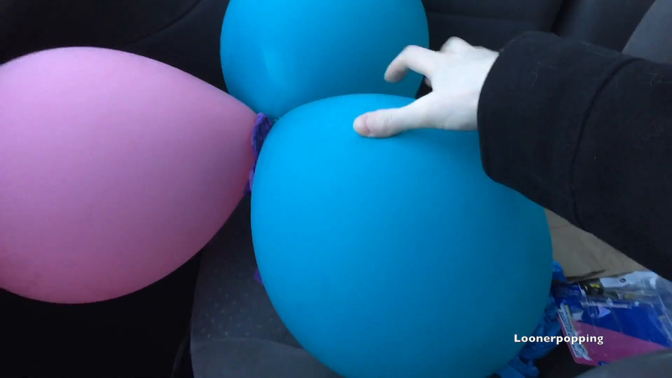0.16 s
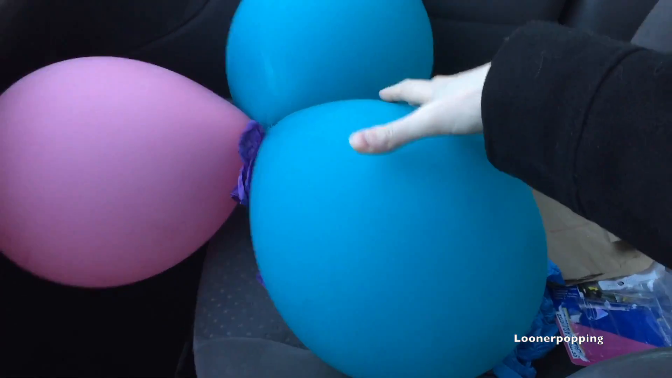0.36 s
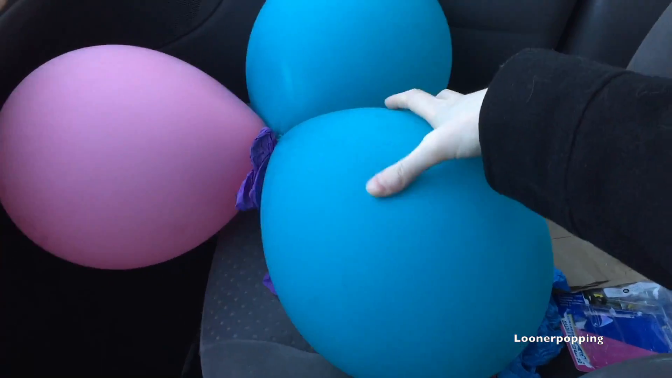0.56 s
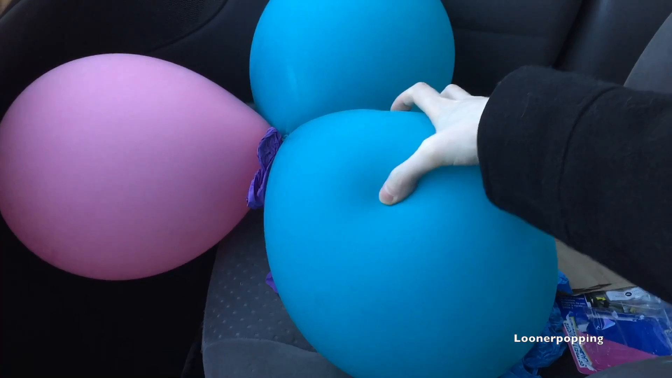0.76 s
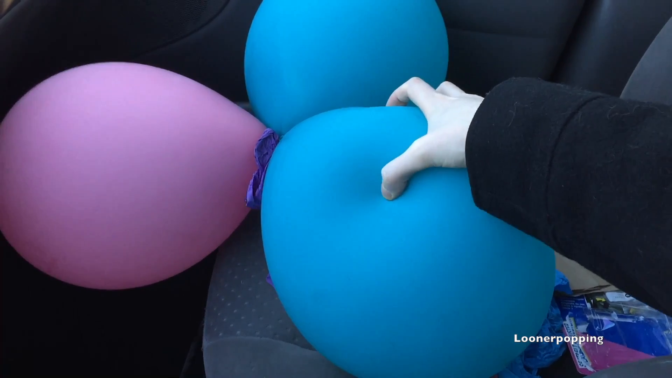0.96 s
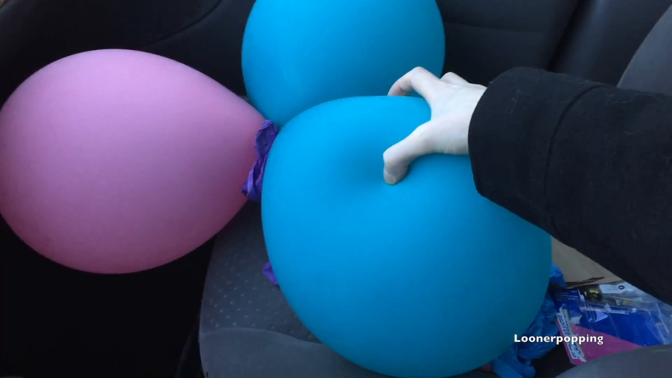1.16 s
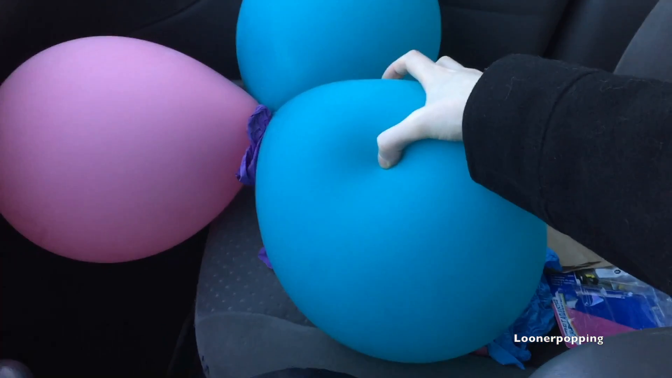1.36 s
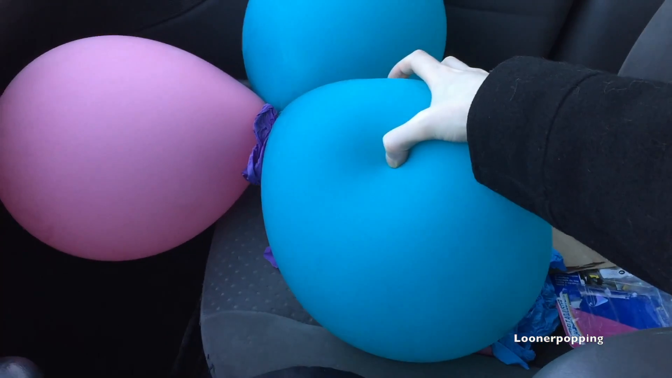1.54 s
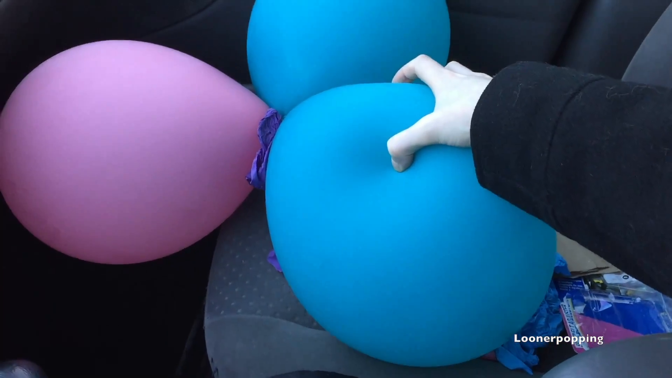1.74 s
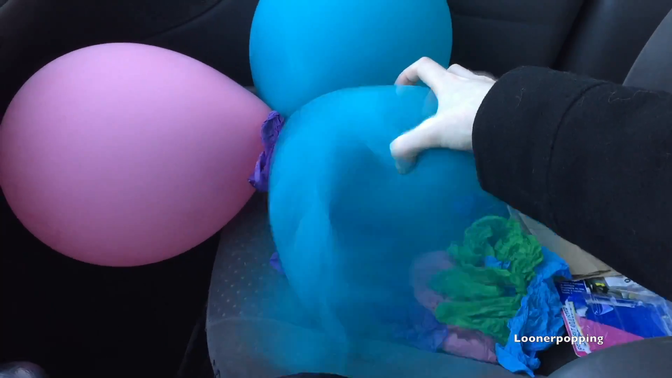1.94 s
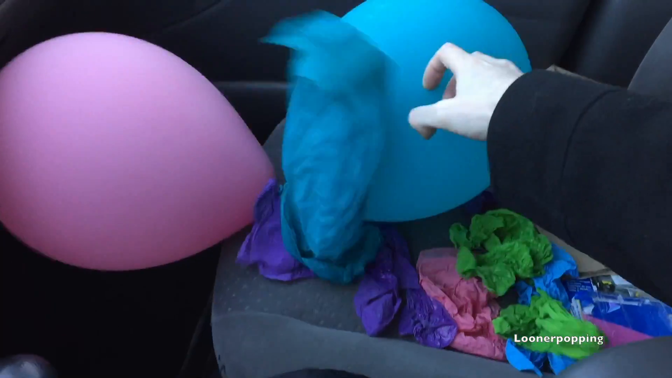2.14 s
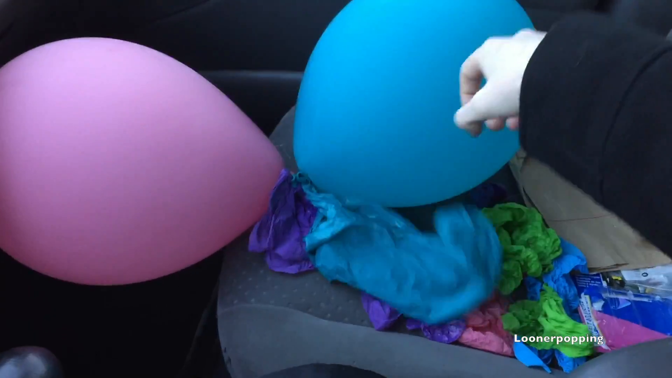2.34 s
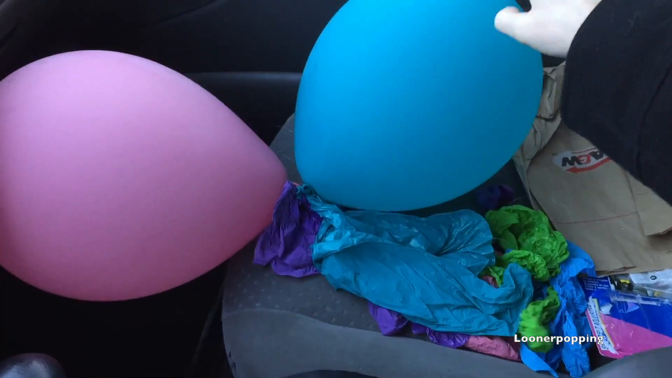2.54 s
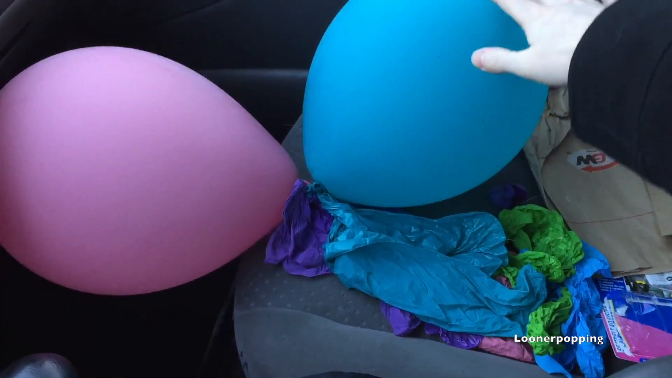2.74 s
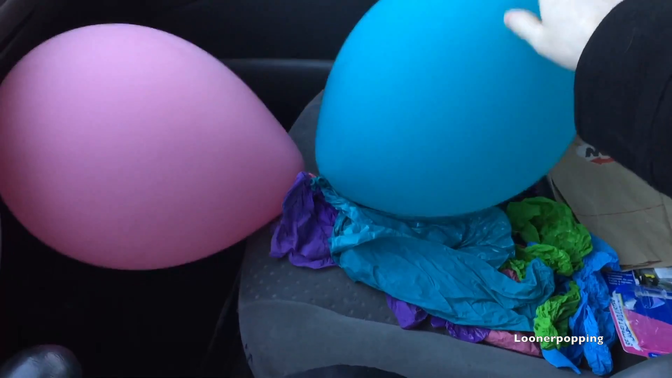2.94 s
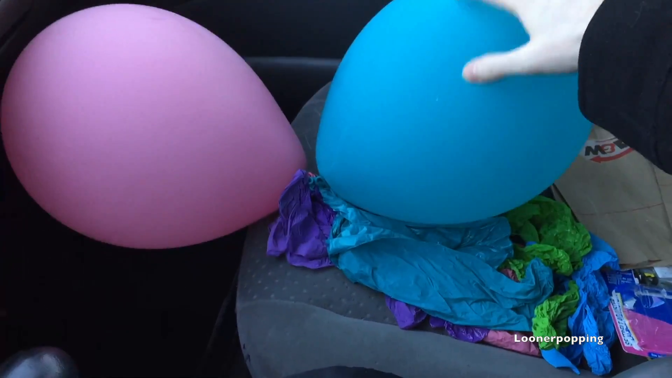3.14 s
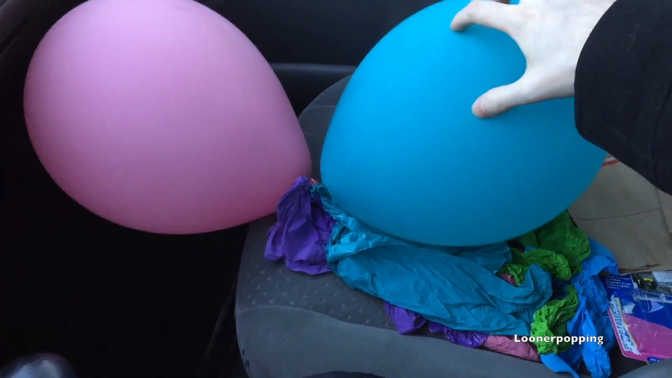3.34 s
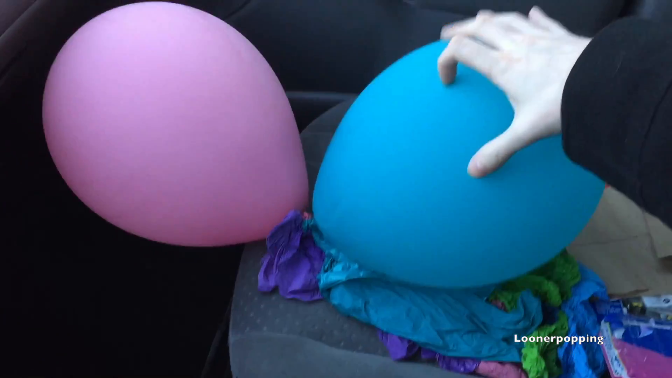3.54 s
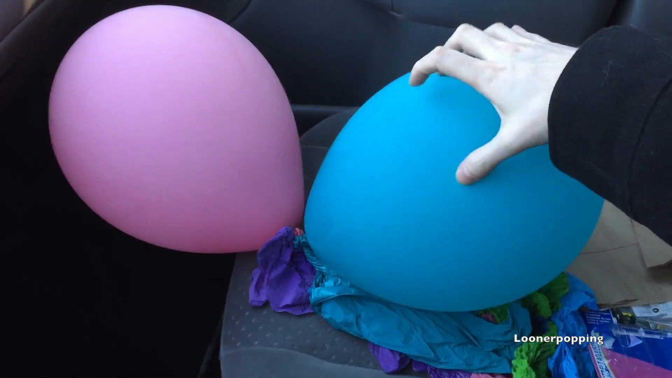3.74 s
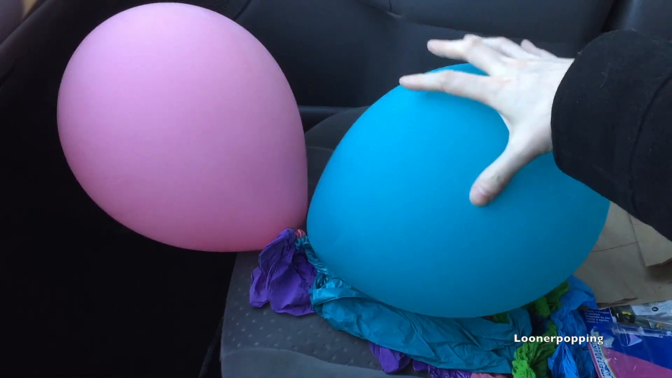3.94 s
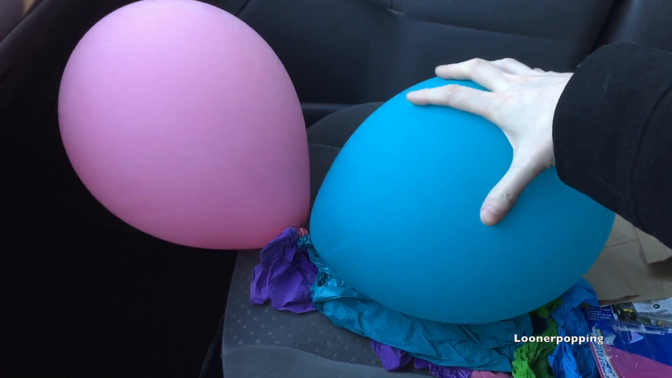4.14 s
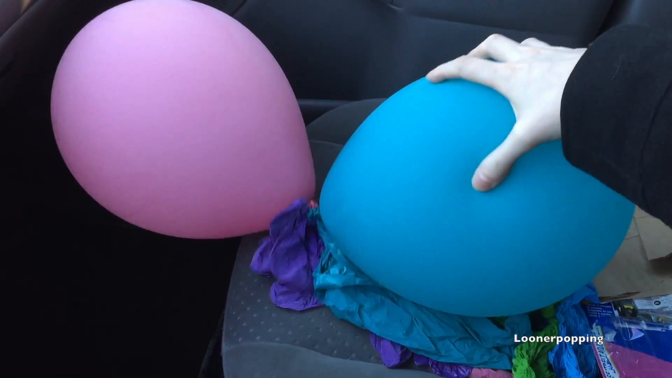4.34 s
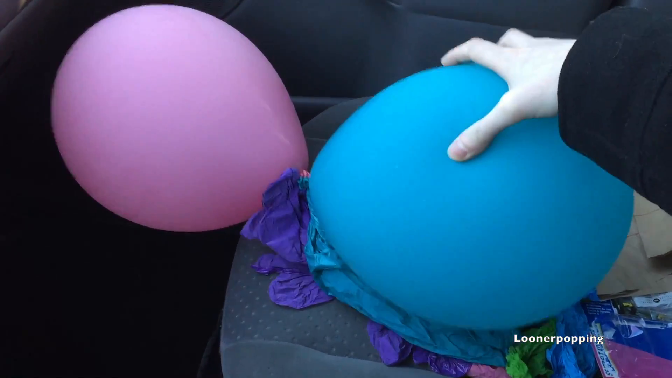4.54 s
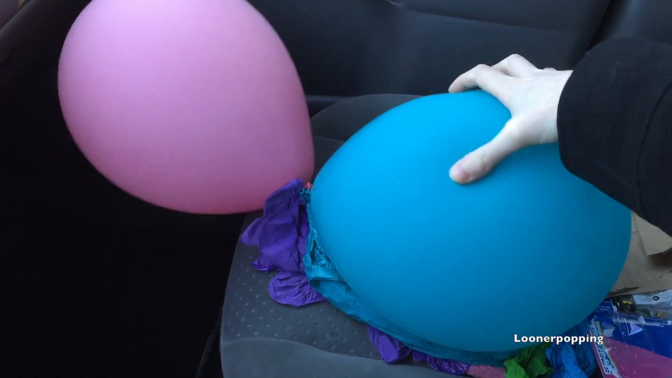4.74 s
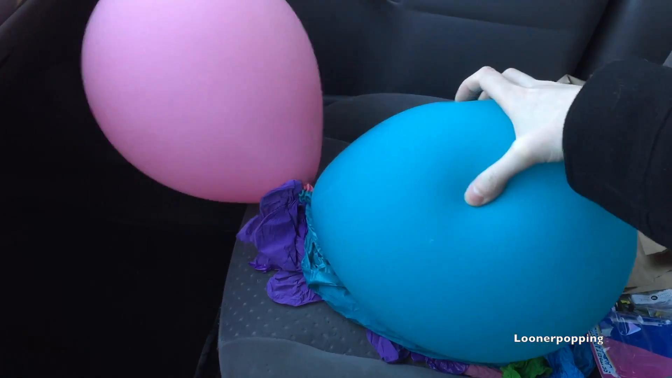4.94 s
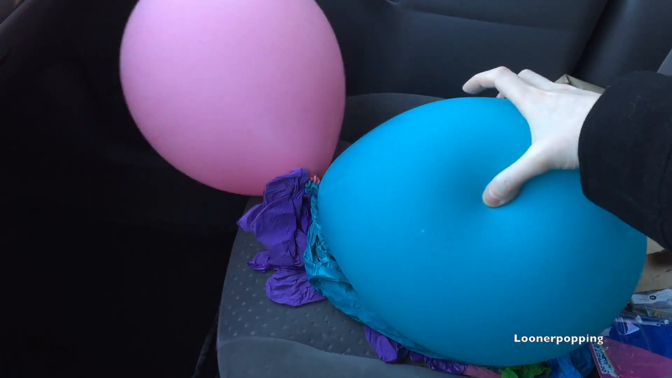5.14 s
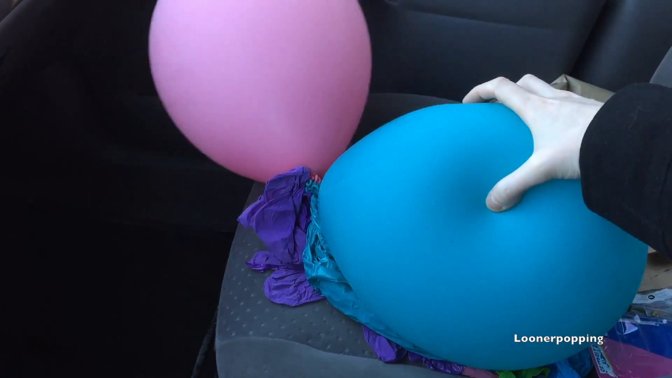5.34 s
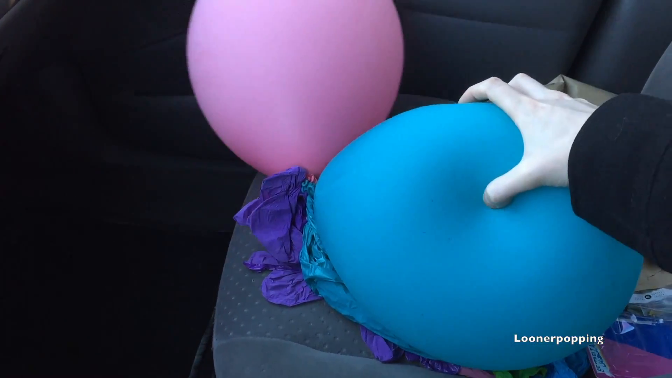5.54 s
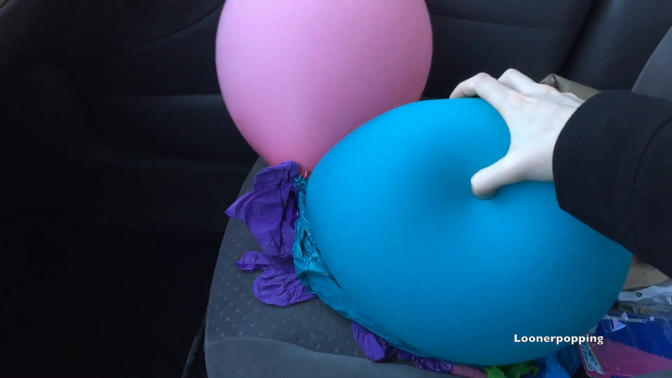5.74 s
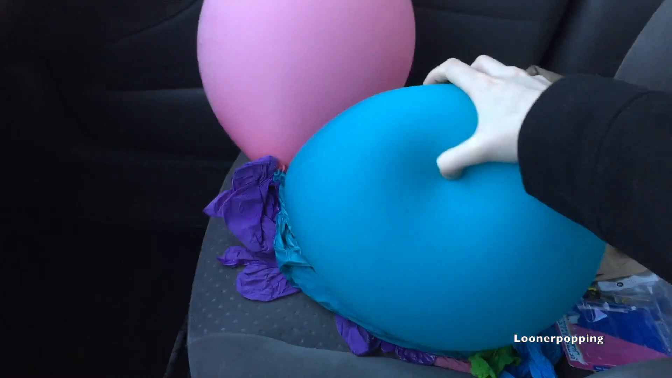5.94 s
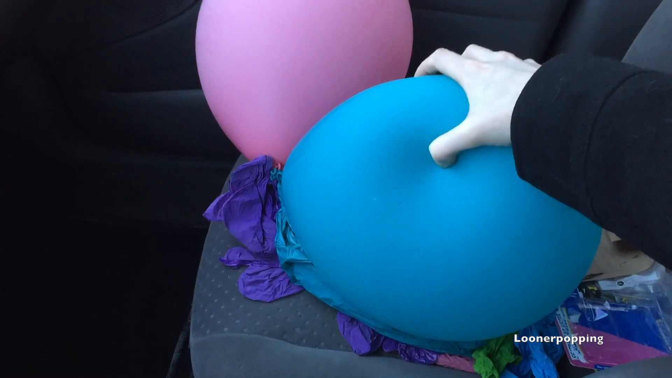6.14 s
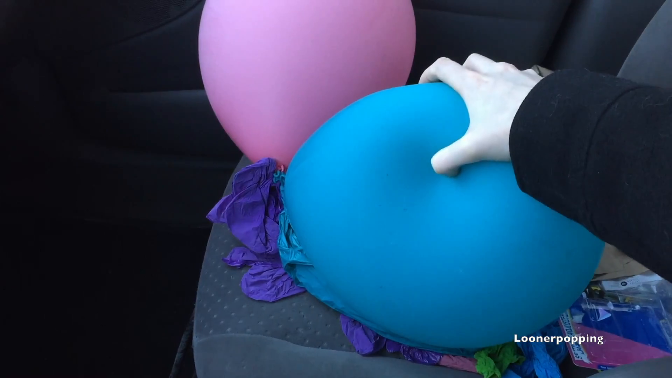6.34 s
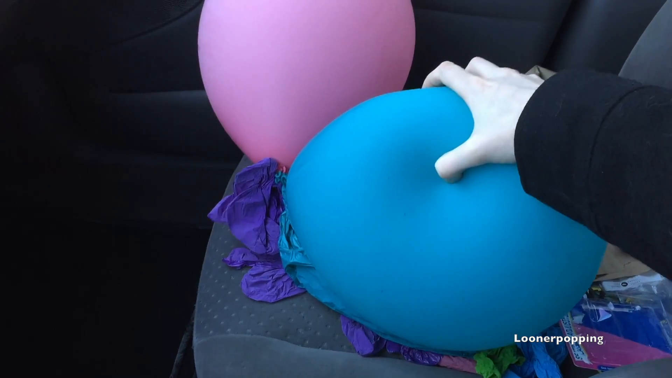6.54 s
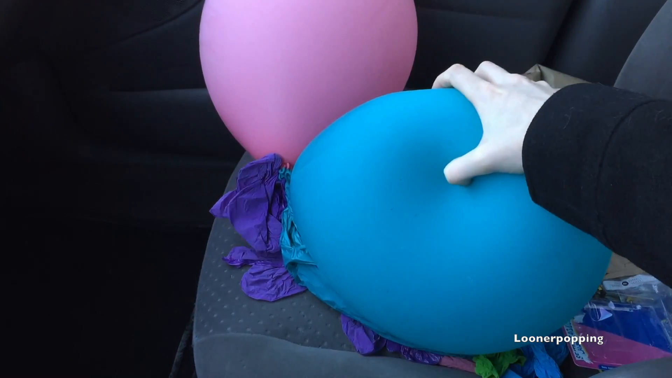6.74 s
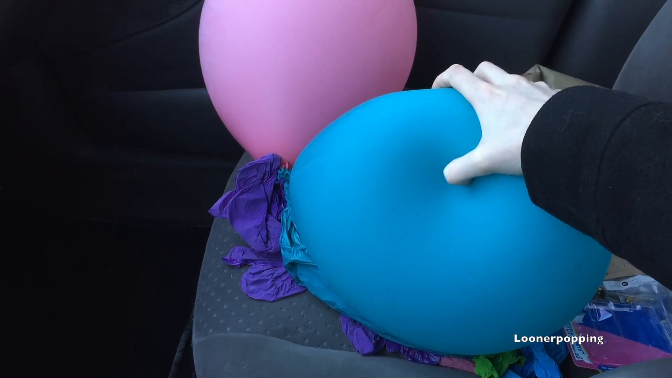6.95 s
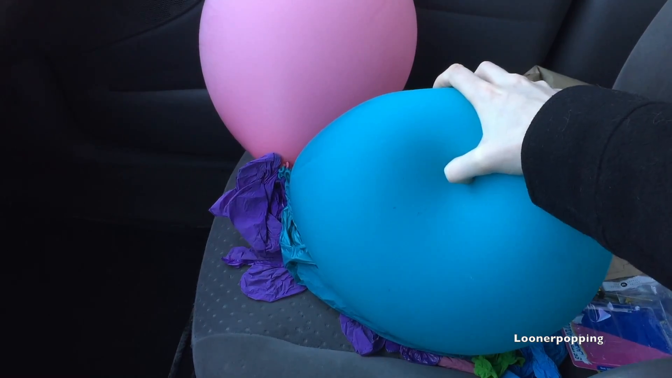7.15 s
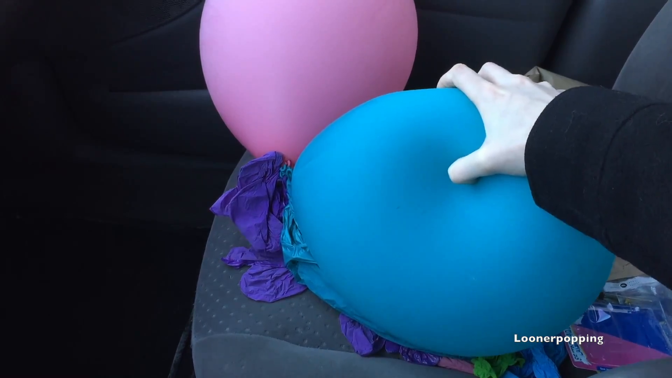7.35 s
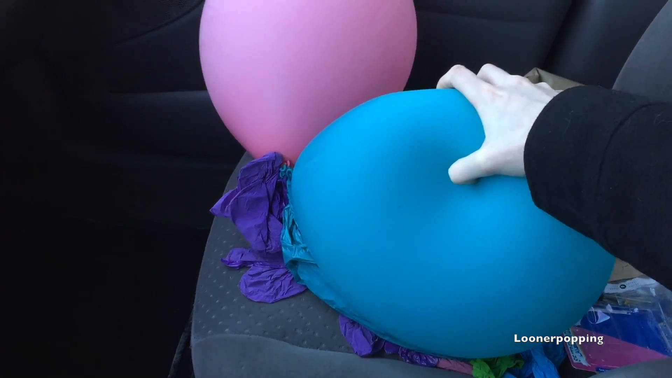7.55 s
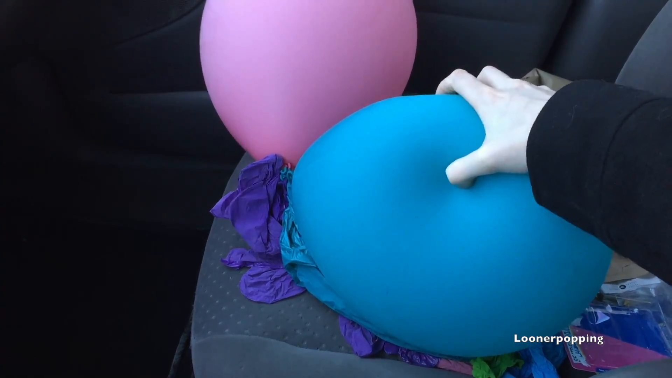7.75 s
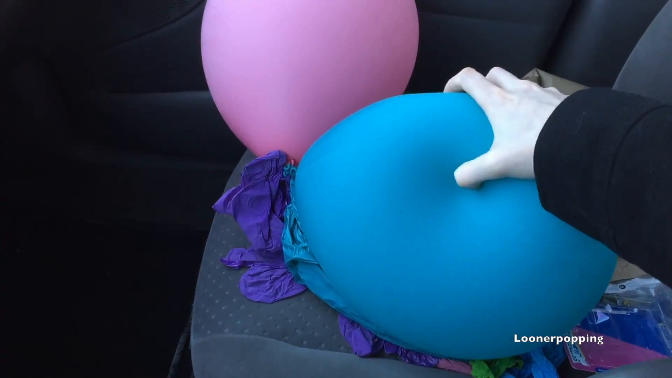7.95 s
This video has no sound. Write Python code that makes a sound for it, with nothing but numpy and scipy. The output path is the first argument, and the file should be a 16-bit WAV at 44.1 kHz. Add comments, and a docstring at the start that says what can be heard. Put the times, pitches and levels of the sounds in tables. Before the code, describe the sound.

Hands squeak and creak against taut latex balloons in a parked car; one bursts with a loud overloaded bang, then the squeezing resumes.

```python
"""Squeezing balloons in a parked car

A hand squeezes latex balloons on the seat, an arm's length from the microphone. The taut rubber sticks and
slips: single slips snap, quick runs of slips creak and squeak, and each rings the air inside.
The balloon bumps and knocks against the seat over a low rumble with faint hiss. One balloon bursts,
overloads the microphone and makes the cabin boom; then the hand grips the next.
"""
import sys
import numpy as np
from scipy import signal
from scipy.fft import rfft, irfft, next_fast_len
from scipy.io import wavfile
from scipy.ndimage import uniform_filter1d, map_coordinates

SR = 44100
rng = np.random.default_rng(int(sys.argv[2]) if len(sys.argv) > 2 else 0)


def dump(signal):
    """Clip the signal to [-1, 1] and save it as 16-bit WAV at the path in sys.argv[1]."""
    limited = np.clip(np.atleast_2d(signal).T, -1, 1)
    pcm = np.round(limited * 32767).astype(np.int16)
    wavfile.write(sys.argv[1], SR, pcm)


N = 356769

SIZE = 2 ** 14  # samples in one response or short sound
TIME = np.arange(N) / SR
AGE = np.arange(SIZE) / SR  # s since a sound began
HZ = np.fft.rfftfreq(SIZE, 1 / SR)
BURST_S = 2.046


def amp(db):
    """Decibels to gain."""
    return 10 ** (np.asarray(db) / 20)


def unit(x):
    """x at rms 1."""
    return x / np.sqrt(np.mean(x ** 2))


def along(points, hz):
    """(Hz, value) points read on a log frequency axis."""
    f, v = np.transpose(points)
    return np.interp(np.log(hz + 1), np.log(f), v)


def add(track, s, sound):
    """Mix a sound into the track at time s."""
    start = max(round(s * SR), 0)
    track[start:start + len(sound)] += sound[:N - start]


def filtered(x, gain):
    """x times a gain that depends on frequency."""
    size = next_fast_len(N + SIZE)
    return irfft(rfft(x, size) * gain(np.fft.rfftfreq(size, 1 / SR)), size)[:N]


def causal(db):
    """The minimum-phase response with these levels."""
    cepstrum = irfft(np.log(amp(db)))
    cepstrum[1:SIZE // 2] *= 2
    cepstrum[SIZE // 2 + 1:] = 0
    return np.exp(rfft(cepstrum))


def fade(t, t60):
    """Exponential decay by 60 dB in t60 seconds."""
    return np.exp(-np.log(1000) * t / t60)


def treble_share(hz, corner_hz=4200):
    """Near 0 well below the corner, near 1 well above it."""
    return 1 - 1 / (1 + (hz / corner_hz) ** 4)


def wobble(hz):
    """A smooth random curve with hz knots a second."""
    knots = rng.standard_normal(int(N * hz / SR) + 4)
    return map_coordinates(knots, [TIME * hz])


def background(level_db=-66):
    """A low rumble in the closed car, under faint hiss: noise shaped to a fixed spectrum."""
    # spectrum of the quiet cabin: f/Hz, relative level/dB
    quiet = [(20, -23), (62, 0), (120, -1), (200, -14.5), (400, -21), (1500, -27.5), (16000, -35.5)]
    noise = rng.standard_normal(N)
    return amp(level_db) * unit(filtered(noise, lambda hz: amp(along(quiet, hz))))


def cabin_tail():
    """Spectrum of the diffuse echoes in the car, of energy 1; the bass outlasts the rest."""
    # how long sound lingers in the cabin: f/Hz, t60/s
    linger = [(60, 0.2), (130, 0.27), (250, 0.031), (600, 0.077), (14000, 0.054)]
    hz, t, z = signal.stft(rng.standard_normal(SIZE), SR)
    decay = fade(t, along(linger, hz)[:, None])
    tail = signal.istft(z * decay, SR)[1][:SIZE]
    return rfft(tail / np.linalg.norm(tail))


def bumps(t60=0.19):
    """Soft pushes of the balloon on the seat: swelling, fading noise gives a dull thud in the cabin."""
    # shoves against the seat: t/s, rise/s, peak level/dB
    shoves = [(.031, 0.057, -31.5), (.295, 0.005, -43), (2.863, 0.0024, -38), (4.114, .024, -38),
              (4.25, 0.032, -40), (5.221, 0.017, -35), (6.049, .005, -39), (7.399, 0.0017, -40.5),
              (7.768, .0015, -38)]
    # spectrum of a thud: f/Hz, relative level/dB
    thud_spectrum = [(25, -28.5), (60, -7), (130, -1.5), (250, -16), (450, -20.5), (4000, -71)]
    out = np.zeros(N)
    for s, rise, db in shoves:
        swell = (1 - np.exp(-AGE / rise)) ** 2
        push = rng.standard_normal(SIZE) * swell * fade(AGE, t60)
        thud = irfft(rfft(push) * causal(along(thud_spectrum, HZ)))
        add(out, s, amp(db) * thud / np.abs(thud).max())
    return out


def knocks(t60=0.046, rise_s=0.00053):
    """The balloon judders on the seat; each hollow knock is a few damped swings of the whole balloon."""
    # knocks: t/s, f/Hz, level/dB before rise and decay
    judders = [(3.259, 125, -31.5), (4.657, 158, -29.5), (4.917, 134, -34), (5.997, 297, -34.5),
               (6.005, 328, -39), (6.018, 260, -34), (6.044, 374, -40), (6.057, 254, -32)]
    envelope = (1 - np.exp(-AGE / rise_s)) * fade(AGE, t60)
    out = np.zeros(N)
    for s, hz, db in judders:
        add(out, s, amp(db) * envelope * np.sin(2 * np.pi * hz * AGE))
    return out


def burst(blast_db=24.5, tear_t60=0.032, cabin_db=-10, boom_db=-24, blur_hz=16, flap_db=-58, flap_t60=.25):
    """The skin rips open, the freed air rings the cabin, and the rag trails off in a faint hiss."""
    # spectrum of the blast: f/Hz, relative level/dB
    blast_spectrum = [(25, -13.5), (60, -1.5), (130, 0.5), (350, 4.5), (700, -1), (1500, -6), (4000, -12.5),
                      (16000, -20)]
    # air modes of the cabin: f/Hz, level/dB relative to boom_db, t60/s
    cabin_modes = [(55.8, -18, 1), (122, -5.5, 0.12), (128, -17, 1), (180, -5.5, .25), (311.5, 2.5, .06)]
    tear = rng.standard_normal(SIZE) * fade(AGE, tear_t60)
    tear_in_cabin = rfft(tear / np.linalg.norm(tear)) + amp(cabin_db) * cabin_tail()
    blast = irfft(tear_in_cabin * causal(along(blast_spectrum, HZ)))
    boom = np.zeros(SIZE)
    for hz, db, t60 in cabin_modes:
        # crowded modes blur each ring: its phase drifts at random
        drift = np.cumsum(rng.standard_normal(SIZE)) * np.sqrt(2 * np.pi * blur_hz / SR)
        phase = 2 * np.pi * hz * AGE + uniform_filter1d(drift, size=512)
        boom += amp(db) * fade(AGE, t60) * np.sin(phase)
    flap = rng.standard_normal(SIZE) * amp(flap_db) * fade(AGE, flap_t60)
    out = np.zeros(N)
    add(out, BURST_S, amp(blast_db) * blast / np.linalg.norm(blast) + amp(boom_db) * boom + flap)
    return out


def surge(level_db=-11, start_hz=1100, end_hz=145, sag_s=0.0028, rise_s=.0007, hold_s=.014, t60=0.024):
    """The freed air of the burst swings to and fro, ever more slowly as the skin pulls away."""
    hz = end_hz + (start_hz - end_hz) * np.exp(-AGE / sag_s)
    envelope = (1 - np.exp(-AGE / rise_s)) * fade(np.maximum(AGE - hold_s, 0), t60)
    swing = np.sin(2 * np.pi * np.cumsum(hz) / SR)
    out = np.zeros(N)
    add(out, BURST_S, amp(level_db) * envelope * swing)
    return out


def squeals(waver=0.05, flutter_db=2, count=3):
    """Brief, wavering tones where the slips fall in step with a mode of the skin."""
    # squeals: centre t/s, length/s, start f/Hz, end f/Hz (before the waver),
    # level of the fundamental/dB, step to each next overtone/dB
    tones = [(0.106, 0.032, 663, 723, -23.5, -26), (.485, .026, 1651, 1680, -35, -12),
             (.513, 0.018, 2268, 2350, -29, -18), (.765, 0.082, 450, 413, -54.5, -4.5),
             (1.189, .045, 450, 472, -47.5, -1), (1.242, 0.038, 451, 426, -51.5, -1.5),
             (3.86, 0.021, 602, 620, -58, 1), (3.923, .07, 674, 553, -52, -6.5),
             (4.721, .016, 445, 560, -31.5, -16), (4.73, .014, 860, 1250, -31.5, -11),
             (6.184, 0.03, 230.3, 288, -21, -31)]
    out = np.zeros(N)
    for s, length, start_hz, end_hz, db, overtone_db in tones:
        size = int(length * SR)
        drift, flutter = unit(uniform_filter1d(rng.standard_normal((2, size)), size=300))
        hz = np.linspace(start_hz, end_hz, size) * (1 + waver * drift)
        phase = 2 * np.pi * np.cumsum(hz) / SR
        tone = sum(amp(k * overtone_db) * np.sin((k + 1) * phase) for k in range(count))
        envelope = np.hanning(size) * unit(amp(flutter_db * flutter))
        add(out, s - length / 2, amp(db) * envelope * tone)
    return out


def skin(near_t60=.024, near_db=2.5, cavity_db=8, cabin_db=-6, bend_cycles=.6, dent=0.04):
    """Response to one slip: a falling chirp, echoes inside the balloon, its air modes and the cabin."""
    # air modes inside the balloon: f/Hz, width/Hz (both before denting), level/dB relative to cavity_db
    cavity = [(275, 55, -2.5), (408, 110, -5), (640, 35, -2.5), (880, 37, -7), (1121, 40, -8.5),
              (1360, 50, -8.5), (1645, 70, -4.5), (2230, 55, -5), (3660, 80, -9)]
    # spectrum of the latex: f/Hz, relative level/dB
    latex = [(30, -32.5), (70, 3), (130, 2.5), (300, -4.5), (700, 0.5), (1400, 0), (3800, -4), (5000, -9),
             (6500, -9.5), (9000, -14.5), (16000, -23.5)]
    # low ripples cross the skin more slowly, so they arrive last
    chirp = np.exp(-2j * np.pi * bend_cycles * np.log(1 + HZ / 250))
    near = rng.standard_normal(SIZE) * fade(AGE, near_t60) * (1 - fade(AGE, 0.0048))
    # the fingers dent the balloon and shift all its air modes by a random share
    hz = HZ * np.exp(dent * rng.standard_normal())
    air = sum(amp(db) * 1j * hz * w / (c * c - hz * hz + 1j * hz * w) for c, w, db in cavity)
    echoes = amp(near_db) * rfft(near / np.linalg.norm(near)) + amp(cabin_db) * cabin_tail()
    response = chirp * (1 + echoes + amp(cavity_db) * air) * causal(along(latex, HZ))
    mids = (HZ > 500) & (HZ < 4500)  # each response is levelled by its energy here
    return response / np.sqrt(np.mean(np.abs(response * mids) ** 2))


def creaks(jitter=.035, scatter_db=2, treble_scatter_db=2):
    """Slips slow enough to be heard one by one, at a gliding rate; rows as in the table of single slips."""
    # creaks: t/s, length/s, start rate/Hz, end rate/Hz, relative level/dB, treble/dB (both before scatter)
    runs = [(1.0603, .06, 59.63, 109.5, -55.5, 7), (1.517, .065, 45.9, 56.93, -62.5, -1),
            (5.446, .065, 84.56, 104.8, -48.5, 3.5), (5.5554, .092, 66.08, 111.8, -46, 5),
            (5.6561, .058, 74.65, 69.85, -45.5, 3.5), (5.857, 0.0738, 26.13, 40.16, -56, 3)]
    rows = []
    for s, length, start_hz, end_hz, db, treble_db in runs:
        t = np.arange(0, length, 1 / SR)
        rate = start_hz * (end_hz / start_hz) ** (t / length)
        at = np.flatnonzero(np.diff(np.floor(np.cumsum(rate) / SR), prepend=-1))
        late, strong, bright = rng.standard_normal((len(at), 3)).T
        times = s + t[at] + jitter * late / rate[at]
        rows += zip(times, db + scatter_db * strong, treble_db + treble_scatter_db * bright)
    return rows


def slips(level_db=27, lead_db=-23, lead_s=0.0078):
    """The rubber slips with a snap, a faint brief noise burst just ahead; echoes and brightness vary."""
    # single slips of the rubber: t/s, level/dB relative to level_db, treble/dB
    single_slips = [(0.0271, -24.5, -3), (0.0447, -28, -1), (0.0638, -31, 1.5), (0.0742, -32.5, -7),
                    (0.3117, -45.5, -5), (0.8489, -34.5, -1.5), (0.8905, -43.5, 4), (0.9035, -31.5, -4),
                    (0.9285, -41.5, 0), (0.9935, -43.5, 3), (1.1306, -37.5, 1), (1.2106, -41.5, 1.5),
                    (1.3582, -54, 0), (1.6471, -57.5, 4), (1.6722, -55.5, 5.5), (1.695, -56.5, 1.5),
                    (1.8051, -55.5, 2.5), (1.9214, -57, -1), (1.9709, -55.5, 2.5), (2.0235, -48, -3.5),
                    (2.2595, -56, -2), (2.8635, -60, -13), (3.2595, -53.5, -7.5), (3.706, -63.5, 9.5),
                    (4.2749, -38.5, -0.5), (4.3248, -47.5, 3.5), (4.3504, -46.5, 1.5),
                    (4.3905, -51.5, -1.5), (4.5653, -48.5, -10.5), (4.653, -46, 3.5), (4.6987, -39, -4.5),
                    (4.7918, -47.5, -4), (4.8199, -39, -2), (4.919, -40, -5), (4.925, -40, -4),
                    (5.1005, -38, -0.5), (5.1235, -36.5, 0), (5.143, -38.5, 0.5), (5.156, -39, 1.5),
                    (5.2295, -40.5, 1.5), (5.2472, -38.5, 1), (5.2835, -47.5, 8), (5.3055, -42, 1.5),
                    (5.327, -44, 2), (5.3465, -49.5, 3), (5.3735, -46, 4.5), (5.395, -47.5, 6),
                    (5.4152, -44, 3.5), (5.4395, -48, 6.5), (5.5225, -44, 2), (5.5425, -44, 4),
                    (5.7275, -44.5, 5.5), (5.7465, -42, 3.5), (5.7596, -30, 4), (5.8069, -53, 2),
                    (6.0552, -46.5, 2), (6.1421, -45, 4), (6.3481, -28, -5.5), (6.4378, -57.5, -0.5),
                    (6.4622, -48.5, 9.5), (6.5637, -45.5, -2.5), (6.6132, -58.5, 8.5), (6.8186, -55.5, 2),
                    (7.003, -54.5, 9), (7.1051, -53, -0.5), (7.2895, -58, 3), (7.3961, -22.5, -1.5),
                    (7.5746, -57, 2), (7.6211, -51.5, 5.5), (7.6653, -55, 3), (7.7666, -32, -1),
                    (7.8973, -55, 4), (8.0397, -50.5, -0.5)]
    out = np.zeros(N)
    for s, db, treble_db in [*single_slips, *creaks()]:
        lead = rng.standard_normal(SIZE) * (AGE < lead_s)
        snap = np.exp(-2j * np.pi * HZ * lead_s)  # one pulse as the noise burst ends
        force = snap + amp(lead_db) * rfft(lead / np.linalg.norm(lead))
        brightness = causal(treble_db * treble_share(HZ, corner_hz=2560))
        add(out, s - lead_s, amp(db + level_db) * irfft(force * skin() * brightness))
    return out


def strokes(graze_hz=300, graze_db=-80, graze_swing_db=3.5, graze_rough=0.78, graze_treble_db=4,
            graze_body_db=0, rise_db_per_s=2100.5, fall_db_per_s=1350):
    """Rate, level, roughness, treble and body of the loudest stroke; in between, the rubber only grazes."""
    # strokes of the rubber: t/s, length/s, start rate/Hz, end rate/Hz (before the waver), drive level/dB,
    # swell over the stroke/dB, roughness (0 regular, about 1 dry), treble/dB, body/dB (before thinning)
    rubber_strokes = [ (0.076, .032, 258.8, 700, -29.5, -1, .1, 1, 1),
                      (.246, .035, 598.4, 501.7, -46, -15, .8, 3.5, 1),
                      (.305, .04, 399.9, 501.7, -44, -21, .7, 5, 1.5),
                      (.436, .012, 400.2, 301.6, -46, 9, .6, 6, -9),
                      (.45, .018, 183.6, 189.8, -34, -1, .05, 4, -1.5),
                      (.469, .011, 519.8, 831, -31, 0, .05, 3, -0.5),
                      (.481, .029, 830, 979.6, -31, -2, .2, 2, -22),
                      (.512, .021, 1148, 897.9, -34, -4, .22, 2, -12),
                      (.803, .032, 801.6, 219.9, -41, 4.5, .2, 3, 3.5),
                      (.865, .28, 209.7, 110.1, -54.5, 2.5, .4, 1, 1.5),
                      (2.036, .01, 500.3, 499.2, -34, 7, .3, -14.5, 11),
                      (2.864, .018, 901.6, 899.7, -56, -1, 0.9, 9.5, 2.5),
                      (2.935, .035, 599, 698, -61, 2, .6, 5.5, 10.5),
                      (2.978, .016, 1203, 1407, -48, -1, 0.8, 14, 12.5),
                      (3.029, .004, 900.6, 896.6, -50, -1, .6, 12, 0),
                      (3.419, .004, 1295, 1301, -47, 1, .4, 13, 3),
                      (3.429, .007, 1404, 1404, -35, 1, 0.6, 15.5, 7.5),
                      (3.445, .024, 679, 641.1, -50, -1, 0.2, 11.5, 5),
                      (3.859, .006, 620, 631.2, -55, 0, .2, 4, -3),
                      (4.161, .03, 479.5, 570.9, -33, 4, .12, 0.5, 5.5),
                      (4.195, .085, 331.2, 399.4, -39, -3, .45, 1, 4.5),
                      (4.288, .26, 599.2, 900.9, -54, -5, .85, 7.5, 3.5),
                      (4.635, .05, 300.2, 248.9, -55, 10, .4, 1, 7.5),
                      (4.716, .014, 418.8, 619.2, -36, 4, .1, 3, -1),
                      (4.844, .02, 799.5, 648.2, -45, 2, .1, 3, 1),
                      (4.865, .017, 700.8, 921, -44, -1, .1, -1, -1),
                      (4.885, .034, 560.7, 301.2, -44, 2, .15, -1.5, -0.5),
                      (4.941, .045, 234.3, 215.6, -33.5, 1, .25, 0, -0.5),
                      (4.985, .105, 215.9, 190.3, -34, -4.5, .22, 3, 0),
                      (5.105, .06, 169.7, 200.3, -47, 2.5, .45, 3.5, -1),
                      (5.174, .032, 259.7, 929.2, -33, 1, .2, 7.5, 0),
                      (5.22, .14, 199.8, 199.7, -51, -5, .5, 2, -4),
                      (5.46, .29, 219.8, 201.2, -45.5, -9, .45, 2.5, -4.5),
                      (5.935, 0.052, 99.8, 100.4, -54, 5, .35, 6.5, 4.5),
                      (5.985, .035, 100, 100.1, -51, -1, .3, 6, 7),
                      (6.045, .04, 139.9, 94.7, -49.5, 0, .3, 3.5, 1),
                      (6.115, .048, 169.7, 190, -52.5, 4, .5, 3, 3),
                      (6.17, .035, 230.8, 291, -39.5, -6.5, .35, 3, 2.5),
                      (6.463, .02, 500.8, 497.5, -47, -8.5, .6, 2, 0),
                      (7.523, .06, 599.8, 596.6, -54.5, -13, 1.1, 2.5, 2.5),
                      (7.749, 0.1, 188.9, 120, -56.5, -14.5, 0.9, -3, -2)]
    grip = np.outer([graze_hz, graze_db, graze_rough, graze_treble_db, graze_body_db], np.ones(N))
    grip[1] += graze_swing_db * wobble(hz=14)
    for s, length, start_hz, end_hz, db, swell_db, rough, treble_db, body_db in rubber_strokes:
        first = max(int(s * SR) - SIZE // 2, 0)
        last = min(int((s + length) * SR) + SIZE // 2, N)
        near = np.arange(first, last)
        t = TIME[near] - s
        done = np.clip(t / length, 0, 1)
        rate = start_hz * (end_hz / start_hz) ** done
        # each stroke swells quickly before its start and dies after its end
        rise = rise_db_per_s * np.maximum(-t, 0)
        fall = fall_db_per_s * np.maximum(t - length, 0)
        level = db + swell_db * done - rise - fall
        stroke = np.broadcast_arrays(rate, level, rough, treble_db, body_db)
        grip[:, near] = np.where(level > grip[1, near], stroke, grip[:, near])
    return grip


def through_skin(drive, travel_s=.08):
    """The drive rings the balloon; its echoes change as the rubbing travels to a new spot."""
    out, hop = np.zeros(N), int(travel_s * SR)
    padded, window = np.pad(drive, (0, 2 * hop)), np.hanning(2 * hop)
    for start in range(0, N - hop, hop):
        piece = padded[start:start + 2 * hop] * window
        add(out, start / SR, irfft(rfft(piece, SIZE) * skin(near_db=0.5)))
    return out


def rubbing(jitter=.5, waver=.04, scatter_db=7, hiss=0.97, slide=0.23, catch=0.26, thin_hz=680):
    """Stick-slip pulses: regular in a squeak, scattered and mixed with hiss in a dry rub."""
    rate, db, rough, treble_db, body_db = strokes()
    # the grip is never steady
    rate = rate * np.exp(waver * unit(uniform_filter1d(rng.standard_normal(N), size=600)))
    at = np.flatnonzero(np.diff(np.floor(np.cumsum(rate) / SR)))
    late, strong, held = rng.standard_normal((len(at), 3)).T
    spacing = SR / rate[at]  # samples from slip to slip
    size = np.sqrt(spacing) * amp(scatter_db * rough[at] * (strong - rough[at]))
    release = at + jitter * rough[at] * spacing * late
    regrip = release + slide * spacing * np.exp(rough[at] * held)

    def train(times):
        """One pulse of the slip's size at each time."""
        return np.bincount(np.clip(times, 0, N - 1).astype(int), size, N)

    # the skin catches again and jerks back
    pulses = (train(release) - catch * train(regrip)) / np.hypot(1, catch)
    pulses = pulses - uniform_filter1d(pulses, size=256)  # steady drag makes no sound
    share = np.clip(hiss * rough ** 2, 0, 1)  # hiss, as a share of the power
    drive = amp(db) * (np.sqrt(1 - share) * pulses + np.sqrt(share) * rng.standard_normal(N))
    drive = drive + (amp(treble_db) - 1) * filtered(drive, treble_share)
    body = thin_hz / (rate + thin_hz) * amp(body_db)  # quick slips are thin
    lows = filtered(drive, lambda hz: 1 - treble_share(hz, corner_hz=1120))
    return through_skin(drive + (body - 1) * lows)


def scene():
    """Everything at the microphone, an arm's length away."""
    seat = bumps() + knocks()
    bang = burst() + surge()
    rubber = squeals() + slips() + rubbing()
    return (background() + seat + bang + rubber)[None]


def record(dry, ceiling=0.56, top_hz=16300):
    """The microphone overloads near its ceiling, as on the burst; nothing is kept above top_hz."""
    clipped = dry[0] / (1 + np.abs(dry[0] / ceiling) ** 6) ** (1 / 6)
    return filtered(clipped, lambda hz: hz < top_hz)[None]


dry = scene()
out = record(dry)
dump(out)
```